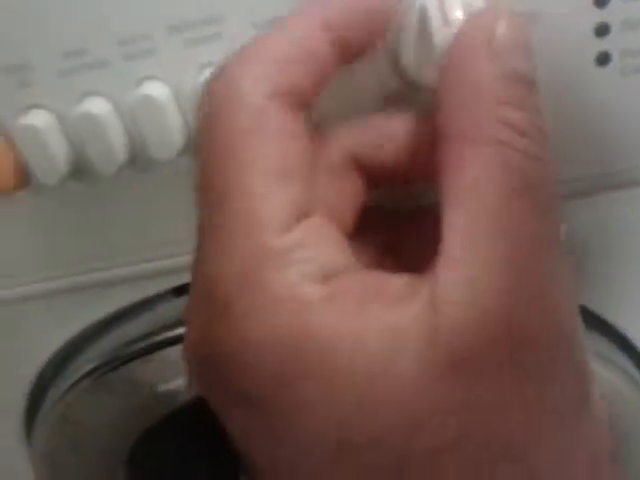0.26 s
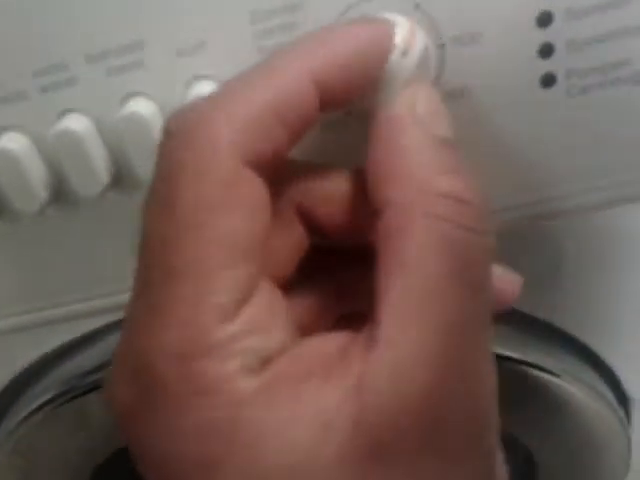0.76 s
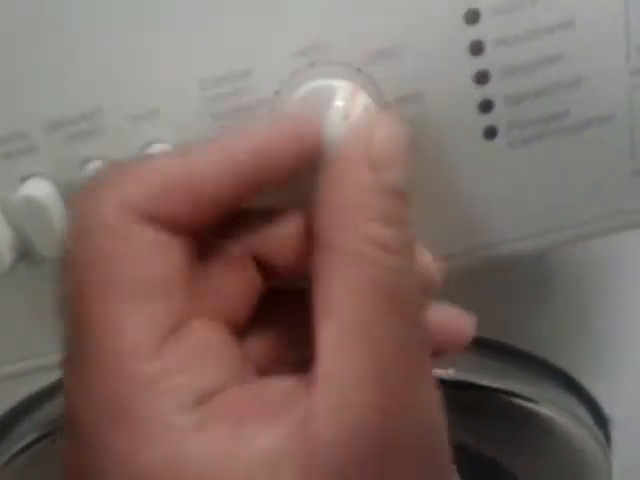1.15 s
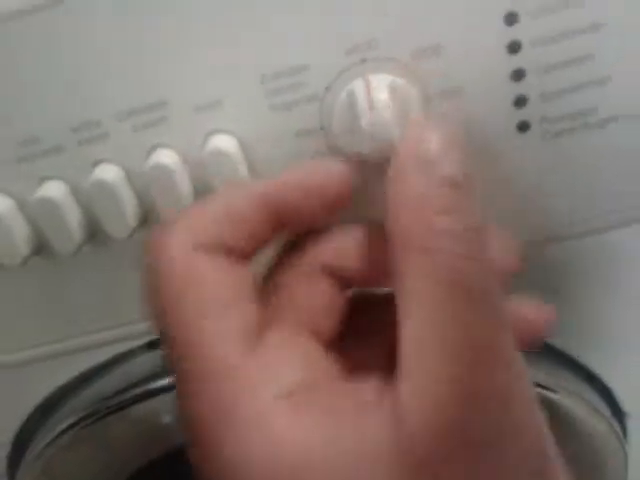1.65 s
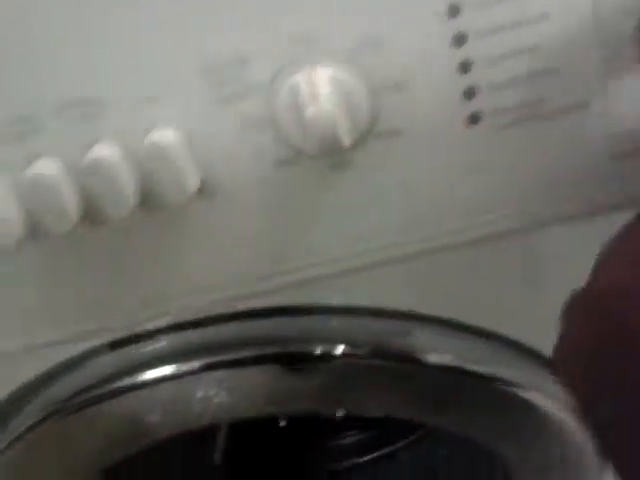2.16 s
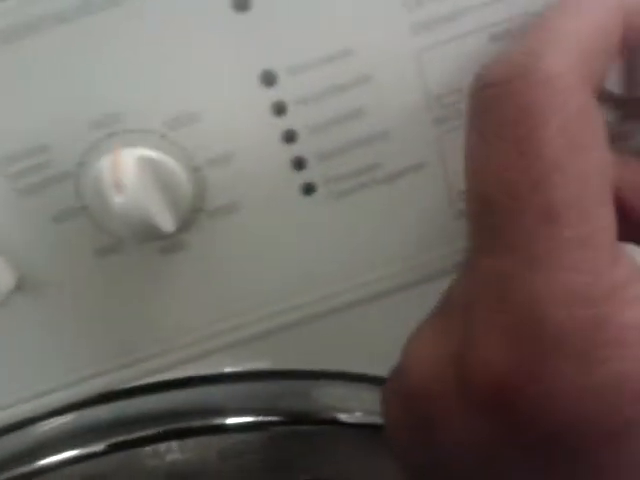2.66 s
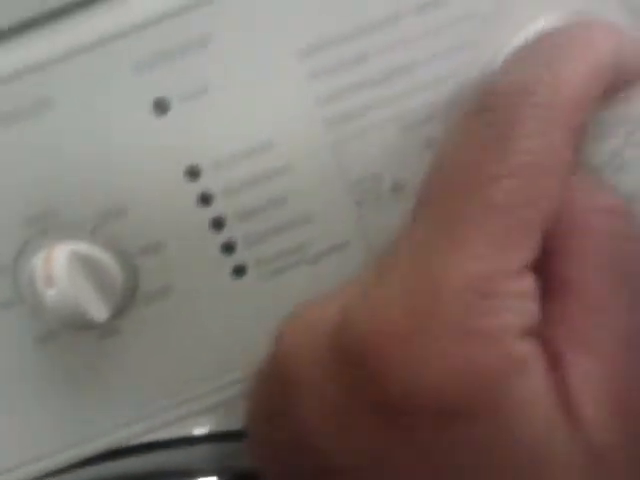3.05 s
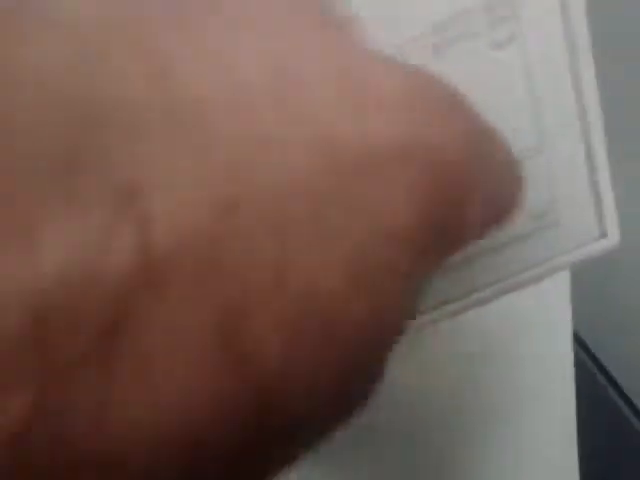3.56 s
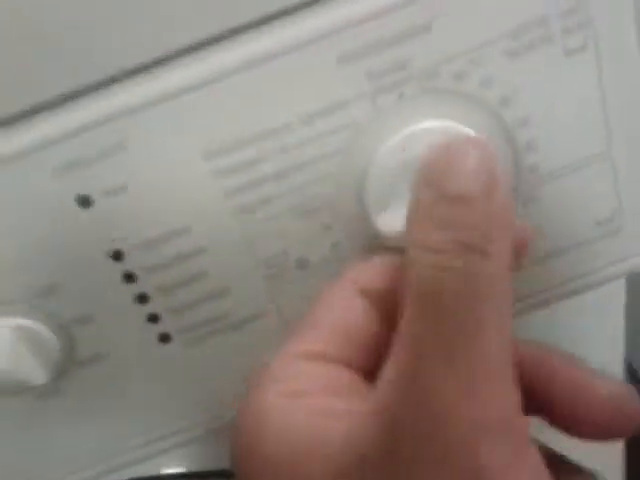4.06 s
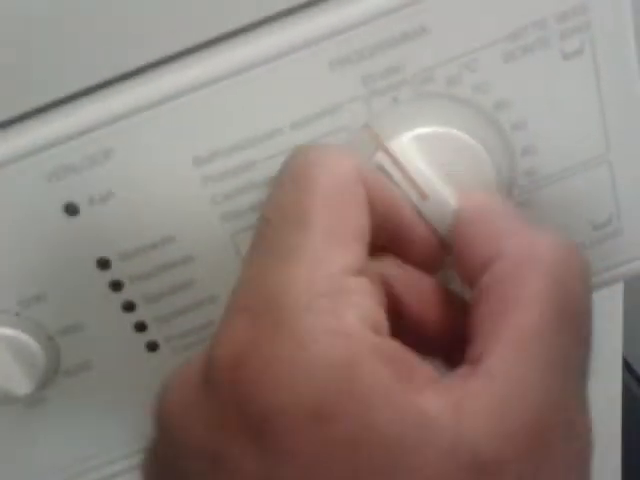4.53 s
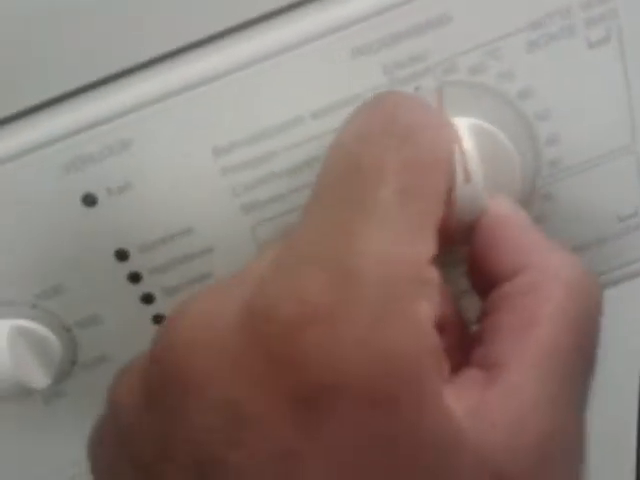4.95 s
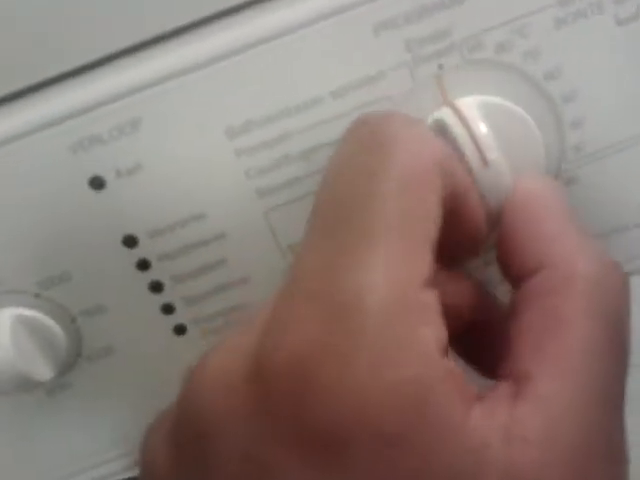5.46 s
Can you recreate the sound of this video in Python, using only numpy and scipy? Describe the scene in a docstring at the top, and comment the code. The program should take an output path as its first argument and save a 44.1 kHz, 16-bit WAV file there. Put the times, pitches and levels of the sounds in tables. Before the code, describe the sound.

A small plastic dial clicks notch by notch, then after faint panel taps a larger dial rattles quickly in two runs, close in a tiled room.

```python
"""A hand first turns a washing machine's small plastic dial notch by notch: noise bursts ring damped modes.
It then moves along the panel with light taps and a fingertip squeak, a gliding resonance of noise.
Last it spins the large program dial in two rattling runs; short swells of noise come before some clicks.
After each click the steel cabinet rings as decaying sines and the tiled room as decaying coloured noise.
A close phone microphone clips the loudest peaks; rumble stays steady and hiss rises with the sound."""
import sys
import numpy as np
from scipy import signal
from scipy.fft import rfft, irfft
from scipy.io import wavfile
from scipy.ndimage import uniform_filter1d

SR = 44100
rng = np.random.default_rng(int(sys.argv[2]) if len(sys.argv) > 2 else 0)


def unload_wav(signal):
    """Save mono or channel-first audio to the path in sys.argv[1] as 16-bit WAV at rate SR, clipped to [-1, 1]."""
    wavfile.write(
        sys.argv[1],
        SR,
        np.round(np.clip(np.atleast_2d(signal).T, -1, 1) * 32767).astype(np.int16),
    )


N = 250929

# notches of the small dial: start_s, level_db, low_db, treble_db, chatter_ms, loudest_hz, release_lead_ms
SMALL_CLICKS = [(.0750, -5.5, -10.5, 3.5, 2.64, 5770, 1.9), (0.2544, -11.5, 11, -21.5, 1, 5500, 2.4),
                (0.6511, -12, 1, 4.5, 7.9, 5650, 1.96), (0.9404, -11.5, 3, 6.5, 2.4, 3850, 2.9),
                (1.1930, -6.5, -0.5, 9, 4.9, 6800, 1.6), (1.4496, -10.5, 9, 9.5, 2.7, 3890, 3.1),
                (1.526, -10.5, 9.5, -10, 1.63, 5770, 2.2)]
# notches of the large dial: start_s, level_db, low_db, treble_db, chatter_ms, loudest_hz
LARGE_CLICKS = [(2.789, -3, 10.5, 16.5, 3.5, 5740), (2.811, -4.5, -5, -6, 3.8, 4700),
                (2.833, -29, -.5, -6, 2.3, 5620), (2.887, -3, 13, 20, 2.9, 5200),
                (2.904, -7, 11, -4.5, 6.5, 4550), (3.013, 5, -1, -4.5, 1.9, 6100),
                (3.0472, -2, 11.5, 19, 2.6, 4800), (3.116, -1, 11.5, 3.5, 2.7, 4230),
                (3.153, -9.5, 2, 8, 7.1, 4950), (3.1957, -9, 11, 7, 9.3, 6080),
                (3.2557, -4.5, 8.5, -27, 2.5, 2520), (3.3192, -7, 9, 14, 2.5, 3600),
                (3.372, -9, 6, -6, 4.9, 5500), (3.411, -6, 4.5, -27, 3.2, 5140),
                (3.458, -10, 3.5, 3, 4.7, 5130), (3.5444, -10.5, 3, -10.5, 8.2, 5100),
                (3.5965, -11, 7, -3, 6.3, 4100), (3.998, -12.5, 27, 13.5, 2.46, 3350),
                (4.2837, -11.5, 7, 8.5, 7.6, 3600), (4.318, -12, 6, 8, 8.3, 3670),
                (4.372, -2.5, 11.5, 14.5, 2.5, 3690), (4.403, -2, 7.5, 15.5, 2.1, 6180),
                (4.4554, -5, 5.5, 11, 3.5, 4500), (4.505, -3, 10, 16, 1.55, 6260),
                (4.59, -5, -7, -4.5, 3.2, 4950), (4.7134, -5, -7, 10.5, 1.94, 5590),
                (4.868, -5, -7, 4.5, 1.9, 5500), (5.202, -7, 6.5, -9, 2.9, 3130)]
# light taps on the panel, and two bounces (0.261 s, 0.267 s) after a dial click:
# start_s, level_db, low_db, treble_db, loudest_hz
TAPS = [(.19, -36, 10, 3, 5800), (.21, -28.5, -5.5, 17, 1020), (.261, -19, -6.5, -24, 6150),
        (0.267, -31, -40, -10, 5780), (0.58, -40.5, 7, 20, 1780), (1.164, -39.5, -14, 15, 4280),
        (1.624, -36, 16, -14, 1770), (1.994, -50.5, -14.5, -5, 5540), (2.096, -25.5, 6, -5, 740),
        (2.319, -37, 6.5, -23, 633), (2.405, -41, -9.5, -2.5, 2720), (2.511, -47.5, 4, 3.5, 606),
        (2.588, -33, 7, -19.5, 440), (2.671, -34.5, 8, -15.5, 774), (2.736, -54, -4.5, -13.5, 528),
        (3.643, -24.5, 2.5, -14, 4600), (3.675, -32.5, 8, -9.5, 4300), (3.848, -46.5, -34, -14, 4460),
        (3.894, -27, -36.5, 10, 5110), (4.942, -42, 13.5, -19.5, 600), (5.109, -54, 6, -20.5, 790),
        (5.497, -47.5, -1, -9, 5110)]
# short swells of noise before some clicks: start_s, end_level_db, rise_ms
SWELLS = [(0.061, -32.5, 15), (1.173, -37.5, 27), (1.432, -46.5, 14), (2.765, -35.5, 44), (4.252, -39, 43),
          (4.484, -34, 29), (5.187, -33, 17)]
# path of the fingertip squeak: time_s, pitch_hz, level_db
SQUEAK = [(2.043, 1780, -47.5), (2.053, 2160, -50.5), (2.062, 3120, -49), (2.09, 3250, -47),
          (2.1, 3400, -46), (2.131, 3700, -57)]
# modes of each part, before a blow tilts and detunes them: pitch_hz, width_hz, level_db (relative)
SMALL_MODES = [(300, 180, -40), (650, 400, -34.5), (1080, 1400, -9.5), (1400, 350, -47.5), (1760, 184, 5),
               (2700, 2700, -4), (3400, 450, 1), (4167, 630, 9), (4740, 470, 1.5), (5780, 1500, 9.5),
               (6800, 980, -13.5), (7960, 2700, -3), (9330, 1100, -18), (13000, 7500, -14)]
LARGE_MODES = [(272, 43, -29.5), (450, 850, -17.5), (740, 770, -8), (1330, 450, -11), (1650, 1200, -4.5),
               (2530, 770, 2.5), (3313, 1090, 11), (4187, 1210, 12.5), (4950, 560, 13.5), (5500, 550, 15),
               (6250, 1574, 11.5), (6430, 270, -5), (8860, 1300, -5), (13200, 5000, -21)]
PANEL_MODES = [(350, 370, 7.5), (630, 1100, 2.5), (1415, 770, 5), (2553, 340, 9), (3600, 670, 6),
               (4770, 1800, 6.5), (7500, 4400, -21), (11000, 12000, -35)]
# ringing of the steel cabinet: pitch_hz, level_db (relative), t60_s
CABINET_MODES = [(263, -1, .25), (341, -5, .2), (759, -12, .15), (2660, -27, .3), (2955, -30, .25),
                 (3540, -29, .3), (4452, -29, .3), (4800, -27, .35), (5269, -30, .3)]
# reverberation time of the room: frequency_hz, t60_s
ROOM_T60 = [(200, 0.69), (500, 0.41), (1500, 0.41), (4000, 0.52), (7000, 0.49), (10000, 0.33), (15000, 1)]
# colour of the reverberation: frequency_hz, level_db (relative)
ROOM_COLOUR = [(200, 4.5), (700, 2.5), (1500, 2.5), (3000, 0), (4500, 0), (5800, 3.5), (7000, -0.5),
               (8500, -3.5), (11000, -5), (15000, -12.5)]
# spectrum of rumble and microphone hiss: frequency_hz, density_db (relative, per Hz)
NOISE_SPECTRUM = [(18, -38), (30, -6.5), (85, -2), (137, 0), (219, -15.5), (1590, -23), (2070, -21.5),
                  (4910, -21), (12900, -24), (14300, -22), (15500, -25.5)]

# how each part is struck: rise_ms, rebound_db, middle_db, thump_db, room_db
SMALL_BLOW = (0.9, -6.5, 0.7, 2.5, -1.4)
LARGE_BLOW = (1.5, -5, 3, 5.5, 0.15)
TAP_BLOW = (1.75, -5, 3.5, 1.5, -2)
REBOUND_MS, TAP_CHATTER_MS = 4.3, 1.95
LOUDEST_WIDTH_HZ, LOUDEST_DB = 324, 12.5
# dB by which middle, thump and room follow one dB of low or treble, or one ms of longer chatter
MIDDLE_PER_LOW, MIDDLE_PER_TREBLE, THUMP_PER_LOW, ROOM_DB_PER_MS = 0.3, 0.2, 0.59, 0.38
# release tick: level relative to its click, and dB gained per dB of the click's treble
TICK_HZ, TICK_WIDTH_HZ, RELEASE_DB, RELEASE_PER_TREBLE = 9500, 1500, -16, 1.4
RUB_DB = -2  # relative to the whistle
CABINET_DB, ROOM_DB = -47.5, -14
MIC_LOW_HZ, SHELF_HZ, EDGE_HZ = 233, 15050, 16300
CLIP_DB, HISS_DB, RUMBLE_DB = -3.6, -55.5, -75.5  # hiss level with the gate fully open


def click(modes, blow, start_s, level_db, low_db, treble_db, chatter_ms, loudest_hz):
    """Selective excitation: the hold makes one mode stand out, and long chatter feeds the room more."""
    rise_ms, rebound_db, middle_db, thump_db, room_db = blow
    middle_db = middle_db + MIDDLE_PER_LOW * low_db + MIDDLE_PER_TREBLE * treble_db
    thump_db = thump_db + THUMP_PER_LOW * low_db
    room_db = room_db + ROOM_DB_PER_MS * (chatter_ms - 2.5)
    tilt = [(300, thump_db), (900, low_db), (2300, middle_db), (5000, 0.0076), (10000, treble_db)]
    modes = modes + [(loudest_hz, LOUDEST_WIDTH_HZ, LOUDEST_DB)]
    near, far = strike(modes, level_db, tilt, rise_ms, chatter_ms, rebound_db, room_db)
    return start_s, near, far


def strike(modes, level_db, tilt, rise_ms, chatter_ms, rebound_db, room_db):
    """Modal excitation: chattering contact and one rebound ring the modes, for microphone and room."""
    ms = np.arange(2600) * 1000 / SR
    rise_ms = max(rise_ms, .1)
    after_rebound = ms - rise_ms - REBOUND_MS
    decay = np.exp(-np.maximum(ms - rise_ms, 0) / max(chatter_ms, .2))
    contact = np.minimum(ms / rise_ms, 1) ** 2 * decay
    contact += amp(rebound_db) * (after_rebound > 0) * np.exp(-abs(after_rebound) / 0.79)
    chatter = rng.standard_normal((len(modes), len(ms))) * contact
    detune = rng.standard_normal(len(modes))
    impulse = 1. * (ms == 0)
    near = power = 0
    for k, (hz, width_hz, mode_db) in enumerate(modes):
        gain = amp(mode_db + read(tilt, hz)) * np.sqrt(width_hz)
        near += gain * ring(chatter[k], hz * (1 + 0.025 * detune[k]), width_hz)
        # heard from all sides, the modes blur
        power += abs(gain * rfft(ring(impulse, hz, 1.83 * width_hz))) ** 2
    far = np.roll(irfft(np.sqrt(power)), 130)  # a compact pulse, shifted by 130 samples
    scale = amp(level_db) / np.sqrt(2 * uniform_filter1d(near ** 2, 60).max())
    return scale * near, scale * amp(room_db) * far


def release_tick(start_s, level_db):
    """Spring release: a brief decaying noise burst rings one very high mode."""
    t = np.arange(300) / SR
    burst = rng.standard_normal(len(t)) * np.exp(-t / 0.001)
    tick = ring(burst, TICK_HZ, TICK_WIDTH_HZ)
    tick = amp(level_db) * tick / abs(tick).max()
    return start_s, tick, tick


def swell(start_s, end_level_db, rise_ms):
    """Swelling noise: modal noise rises by 27.4 dB towards its end."""
    ms = np.arange(round(rise_ms * SR / 1000)) * 1000 / SR
    noise = rng.standard_normal(len(ms))
    sound = evened(resonant_body(noise, LARGE_MODES))
    sound = sound * amp(end_level_db - 27.4 * (1 - ms / rise_ms))
    return start_s, sound, sound


def squeak():
    """Stick-slip friction: skin on plastic gives a broken rising whistle in a broad rub."""
    times_s, pitch_hz, level_db = np.transpose(SQUEAK)
    t = np.arange(times_s[0], times_s[-1], 1 / SR)
    slip, rubbing, unsteadiness = rng.standard_normal((3, len(t)))
    whistle = ring(slip, np.interp(t, times_s, pitch_hz), 530)
    whistle = whistle * amp(2.5 * evened(uniform_filter1d(unsteadiness, 250)))
    rub = resonant_body(rubbing, PANEL_MODES)
    sound = amp(np.interp(t, times_s, level_db)) * (evened(whistle) + amp(RUB_DB) * evened(rub))
    return times_s[0], sound, sound


def resonant_body(x, modes):
    """Superposition: the modes answer the same excitation in parallel."""
    return sum(amp(level_db) * resonate(x, hz, width_hz) for hz, width_hz, level_db in modes)


def ring(x, hz, width_hz):
    """Cascaded resonance: filtering twice steepens the skirts; the result has rms 1."""
    return evened(resonate(resonate(x, hz, width_hz), hz, width_hz))


def resonate(x, hz, width_hz):
    """Heterodyne resonance: shift hz (fixed or gliding) to zero, smooth, shift back; peak gain 1."""
    turn = np.exp(2j * np.pi * np.cumsum(hz * np.ones(len(x))) / SR)
    r = np.exp(-np.pi * width_hz / SR)
    smooth = signal.lfilter([1 - r], [1, -r], x / turn + 1e-18)
    return 2 * (turn * smooth).real


def cabinet(x):
    """Structure-borne response: each sound shakes the thin steel walls into decaying sines."""
    t = np.arange(SR // 2) / SR
    walls = sum(amp(level_db - 60 * t / t60_s) * np.sin(2 * np.pi * hz * t)
                for hz, level_db, t60_s in CABINET_MODES)
    return amp(CABINET_DB) * signal.fftconvolve(x, walls)[:N]


def room(x):
    """Diffuse reverberation: dense reflections build up in 2.2 ms, then each band dies at its own speed."""
    hz, t, bands = signal.stft(rng.standard_normal(SR), SR, nperseg=256)
    bands = bands * amp(-60 * t / read(ROOM_T60, hz)[:, None])
    bands = bands * amp(read(ROOM_COLOUR, hz))[:, None]
    tail = signal.istft(bands, SR, nperseg=256)[1][:SR]
    tail = tail * np.minimum(np.arange(SR) / SR / 0.0022, 1)
    return amp(ROOM_DB) * signal.fftconvolve(x, tail / np.linalg.norm(tail))[:N]


def background_noise(lo_hz, hi_hz):
    """Stationary noise: a random spectrum shaped by the noise table, between two frequencies; rms 1."""
    hz = np.fft.rfftfreq(N + 1, 1 / SR)
    spectrum = rfft(rng.standard_normal(N + 1)) * amp(read(NOISE_SPECTRUM, hz))
    spectrum = spectrum * (hz >= lo_hz) * (hz < hi_hz)
    return evened(irfft(spectrum, N + 1)[:N])


def amp(db):
    """Decibel law: amplitude ratio of a level."""
    return 10 ** (np.asarray(db) / 20)


def evened(x):
    """Power normalisation: scales to rms 1."""
    return x / np.sqrt(np.mean(x ** 2) + 1e-20)


def read(points, hz):
    """Logarithmic pitch scale: interpolates a (frequency_hz, value) table along log frequency."""
    f, value = np.transpose(points)
    return np.interp(np.log(hz + 1), np.log(f + 1), value)


def add(mix, start_s, sound):
    """Superposition: mixes a sound in at its start."""
    part = mix[round(start_s * SR):][:len(sound)]
    part += sound[:len(part)]


def scene():
    """Source position: sounds take three room spots in turn, so neighbours in the list echo differently."""
    sounds = [click(SMALL_MODES, SMALL_BLOW, *row) for *row, _ in SMALL_CLICKS]
    # the spring leaves the notch just before each small click, louder before bright ones
    for start_s, level_db, _, treble_db, *_, lead_ms in SMALL_CLICKS:
        tick_db = level_db + RELEASE_DB + RELEASE_PER_TREBLE * treble_db
        sounds.append(release_tick(start_s - lead_ms / 1000, tick_db))
    sounds += [click(LARGE_MODES, LARGE_BLOW, *row) for row in LARGE_CLICKS]
    sounds += [swell(*row) for row in SWELLS]
    sounds += [click(PANEL_MODES, TAP_BLOW, *row, TAP_CHATTER_MS, hz) for *row, hz in TAPS]
    sounds.append(squeak())
    direct, spots = np.zeros(N), np.zeros((3, N))
    for k, (start_s, near, far) in enumerate(sounds):
        add(direct, start_s, near)
        add(spots[k % len(spots)], start_s, far)
    return (direct + cabinet(direct) + sum(room(x) for x in spots))[None]


def record(dry):
    """Transducer limits: weak bass, hiss gated by the sound level, clipped peaks, then a treble limit."""
    bass_cut = signal.butter(3, MIC_LOW_HZ, "high", fs=SR, output="sos")  # small capsule
    dry = signal.sosfilt(bass_cut, dry)
    level_db = 10 * np.log10(abs(uniform_filter1d(dry[0] ** 2, 441)) + 1e-9)
    open_db = uniform_filter1d(np.clip(.5 * (level_db + 46), -13, 0), size=1500)
    fall_db = np.arange(N) * 40.0 / SR  # the gate closes at 40 dB a second at most
    gate_db = np.maximum.accumulate(open_db + fall_db) - fall_db
    hiss = amp(HISS_DB + gate_db) * background_noise(180, SR)
    rumble = amp(RUMBLE_DB) * background_noise(0, 140)
    clipped = np.clip(dry + hiss + rumble, -amp(CLIP_DB), amp(CLIP_DB))
    # the treble drops to a faint shelf, then to nothing
    corners_hz = [0, SHELF_HZ, SHELF_HZ + 100, EDGE_HZ, EDGE_HZ + 600, SR / 2]
    treble_limit = signal.firwin2(801, corners_hz, [1, 1, .06, .03, 0, 0], window=("kaiser", 9), fs=SR)
    return signal.oaconvolve(clipped, treble_limit[None], "same")


dry = scene()
out = record(dry)
unload_wav(out)
```